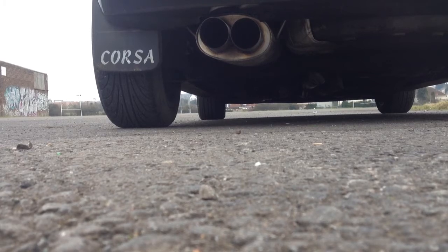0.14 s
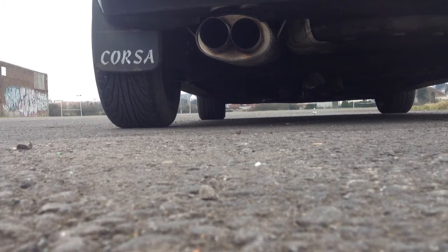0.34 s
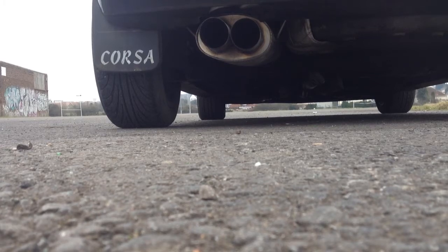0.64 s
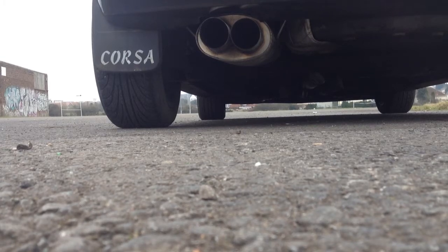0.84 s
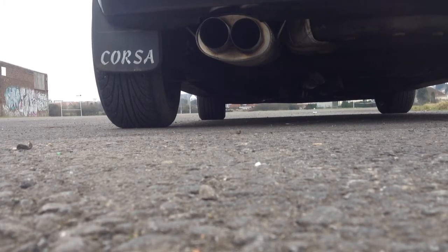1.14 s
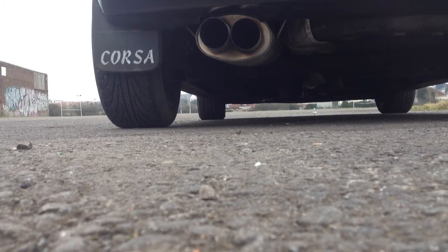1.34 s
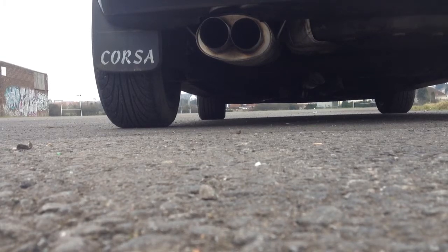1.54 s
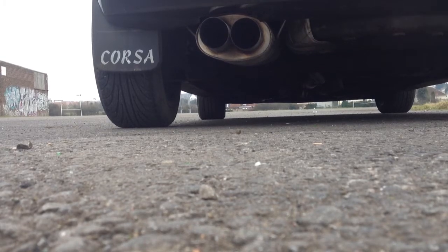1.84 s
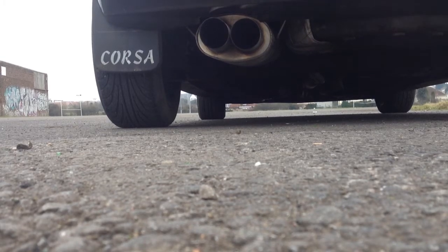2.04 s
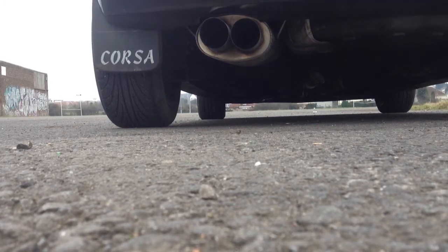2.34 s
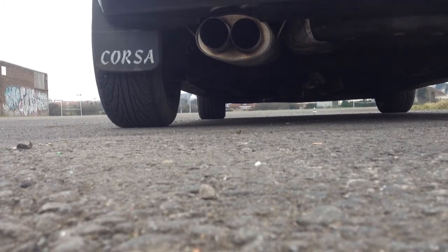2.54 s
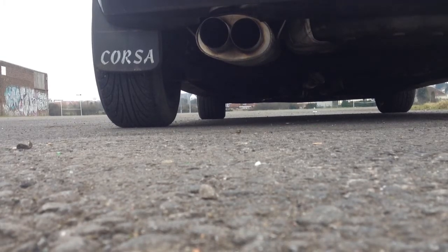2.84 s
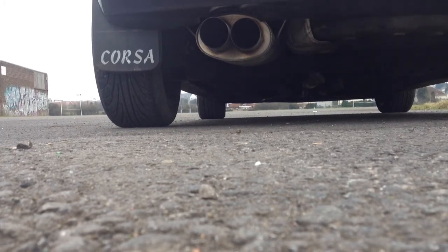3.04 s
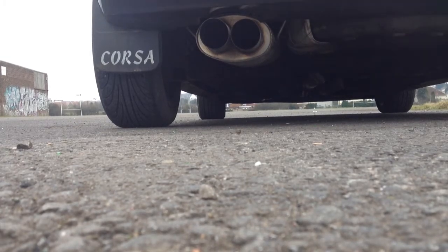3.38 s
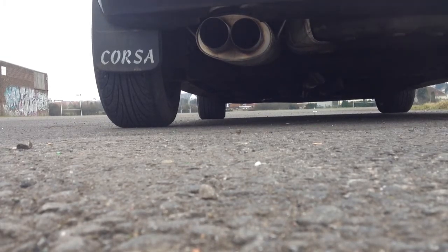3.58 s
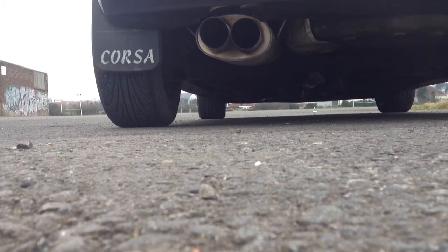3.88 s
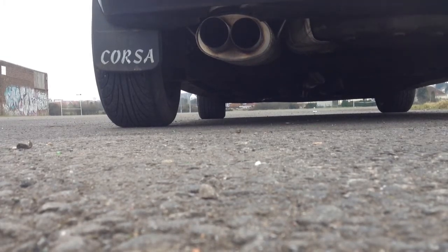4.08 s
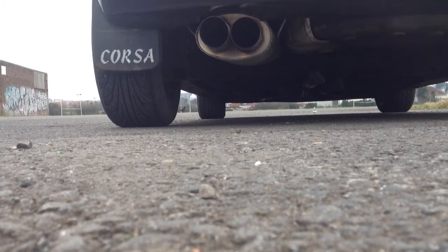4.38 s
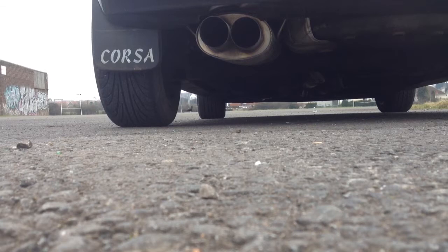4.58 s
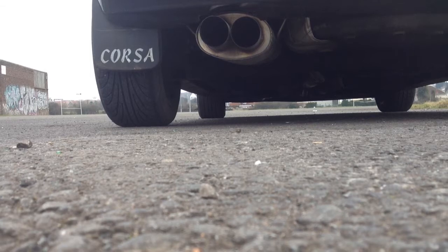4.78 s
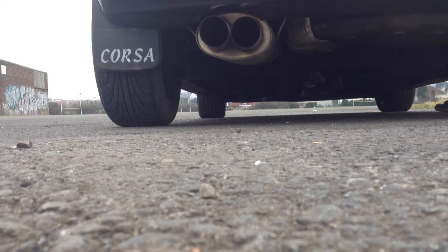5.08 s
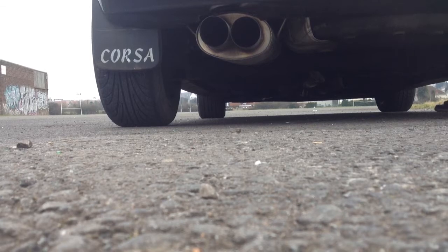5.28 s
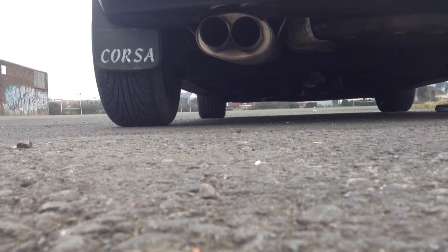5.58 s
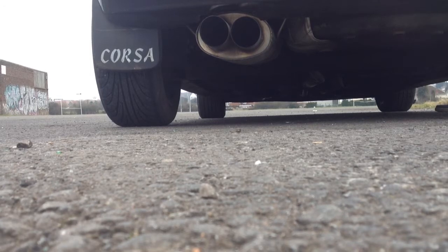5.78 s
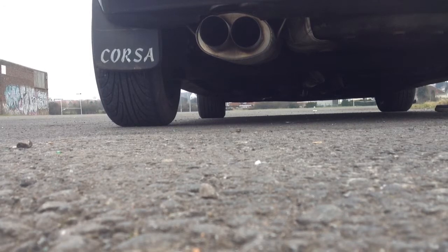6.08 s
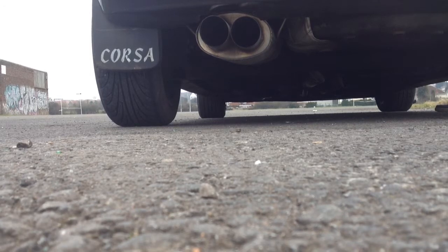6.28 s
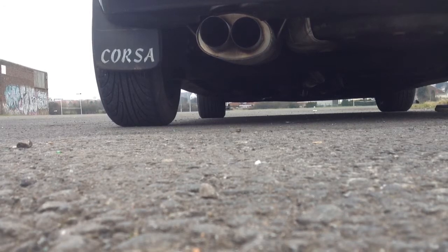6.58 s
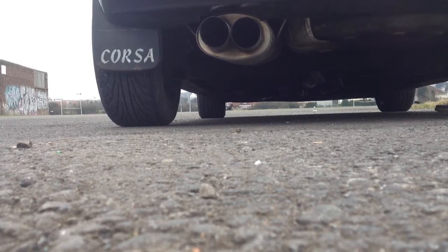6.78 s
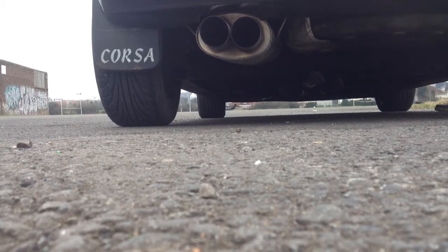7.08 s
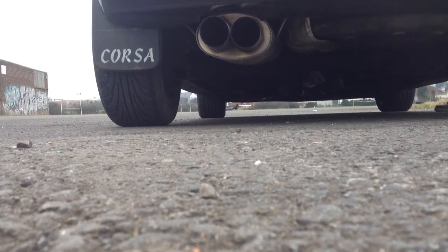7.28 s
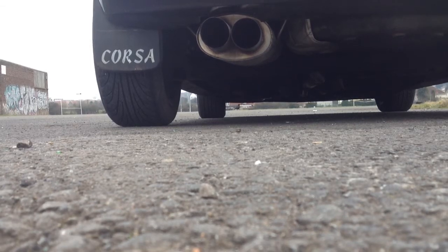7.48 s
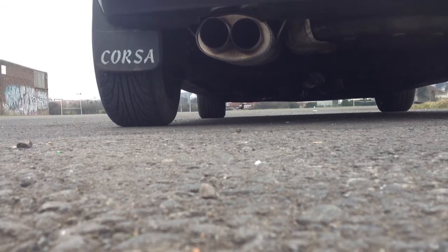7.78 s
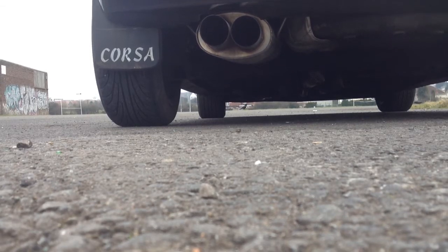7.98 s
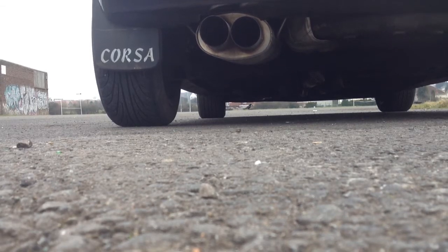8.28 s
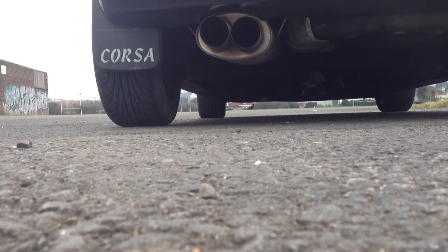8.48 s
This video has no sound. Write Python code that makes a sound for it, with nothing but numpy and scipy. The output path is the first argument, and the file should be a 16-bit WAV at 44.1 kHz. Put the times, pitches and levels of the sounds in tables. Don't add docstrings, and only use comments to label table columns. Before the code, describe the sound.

Ground-level, close and dry, behind a small four-cylinder car in an open lot. From 0 s it idles at about 26 pulses a second: soft, low, uneven puttering with random richer puffs, over ticking valve clatter and fine hiss. Cloth rubs at the start; shoe scuffs and knocks come around 0.8, 1.4, 1.8 and 2.3 s. At about 3.15 s the car door slams, by far the loudest hit, a hard crack with hollow panel ring and quick rebounds; the idle ducks slightly and recovers. A heavy seat thud lands at 4.0 s, with smaller bumps and gritty ticks until 5.75 s. At 6.4 s air whistles in and the exhaust leaps to a throaty growl, peaking near 6.85 s, then drops to a smoother pumping note, refiring quietly near 7.3 s. A higher blip peaks at 7.75 s and falls until 8.4 s. A third starts at 8.5 s, still rising at the end.

```python
import sys
import numpy as np
from scipy import signal
from scipy.fft import rfft, irfft, next_fast_len
from scipy.io import wavfile
from scipy.ndimage import uniform_filter1d

SR = 44100
rng = np.random.default_rng(int(sys.argv[2]) if len(sys.argv) > 2 else 0)


def natural_amplitude(level_db):
    exponent = np.asarray(level_db, float) / 20
    return 10 ** exponent


def materialize(psi):
    bounded = np.clip(np.atleast_2d(psi).T, -1, 1)
    quanta = np.round(bounded * 32767).astype(np.int16)
    wavfile.write(sys.argv[1], SR, quanta)


N = 380583
TIME_S = np.arange(N) / SR


def rms_one(x):
    return x / np.sqrt(np.mean(x ** 2) + 1e-20)


def in_time(rows):
    s, *columns = np.transpose(rows)
    return [np.interp(TIME_S, s, c) for c in columns]


def ramp(start_s, length_s):
    return ((TIME_S - start_s) / length_s).clip(0, 1)


def drift(rate):
    r = np.exp(-80 * np.pi * rate / SR)
    slow = signal.lfilter([1], [1, -2 * r, r * r], rng.standard_normal(N // 40 + 2002))
    slow = slow[2000:]
    return np.interp(np.arange(N) / 40, np.arange(len(slow)), rms_one(slow))


def resonate(x, hz, width_hz, order=1):
    r = np.exp(-np.pi * width_hz / SR)
    b = [(1 - r * r) / 2, 0, (r * r - 1) / 2]
    a = [1, -2 * r * np.cos(2 * np.pi * hz / SR), r * r]
    for _ in range(order):
        x = signal.lfilter(b, a, x + 1e-18)
    return x


def banded_noise(spectrum, patchy_db):
    hz, level_db = np.transpose(spectrum)
    size = next_fast_len(N)
    bins = np.fft.rfftfreq(size, 1 / SR) + 1
    shape_db = np.interp(np.log(bins), np.log(hz), level_db, -99, -99)
    coloured = rfft(rng.standard_normal(size)) * natural_amplitude(shape_db)
    out = np.zeros(N)
    for centre in np.arange(np.floor(2 * np.log2(hz[0])), 2 * np.log2(hz[-1]) + 1):
        share = np.clip(1 - abs(2 * np.log2(bins) - centre), 0, 1)
        out += irfft(coloured * share)[:N] * natural_amplitude(patchy_db * drift(6.1))
    return rms_one(out)


def add(out, s, sound):
    i = round(s * SR)
    out[i:i + len(sound)] += sound[:N - i]


def burst(peak_db, t60, hz, spread):
    t = np.arange(int(.25 * SR)) / SR
    envelope = natural_amplitude(-60 * t / t60) * np.minimum(t / 0.0015, 1)
    puff = resonate(rng.standard_normal(len(t)) * envelope, hz, spread * hz, order=2)
    return natural_amplitude(peak_db) * puff / abs(puff).max()


# (t/s, firing rate f/Hz)
CRANK_SPEED = [(0.0, 26.41), (0.8, 25.51), (1.7, 26.11), (2.6, 25.68), (3.6, 26.15), (6.1, 25.64),
               (6.498, 25.96), (6.857, 71.72), (6.896, 67.08), (7.233, 56.45), (7.453, 55.34),
               (7.565, 60.97), (7.725, 91.54), (7.757, 91.15), (8.254, 70.81), (8.519, 62.74),
               (8.578, 65.77), (8.63, 72.6)]


def crankshaft():
    speed, = in_time(CRANK_SPEED)
    return speed


# (pedal down t/s, lift and fuel cut t/s, fuel back t/s, level when fuel is back/dB)
BLIPS = [
    (6.409, 6.855, 7.272, -24.5),
    (7.437, 7.75, 8.41, -21),
    (8.502, 9.0, 9.2, -20),
]


def pedal():
    fill_s, cut_s, turn_over_s, refire_s = 0.13, 0.012, 0.046, 0.016
    cut_push = -0.45
    throttle, push = np.zeros(N), np.ones(N)
    for down, lift, back, _ in BLIPS:
        throttle += ramp(down, fill_s) - ramp(lift, cut_s)
        push += (cut_push - 1) * ramp(lift, cut_s)
        push -= (cut_push + 1) * ramp(lift + cut_s, turn_over_s)
        push += 2 * ramp(back, refire_s)
    return throttle.clip(0, 1), push


# (t/s, level/dB)
RICH_FIRINGS = [(0.007, -38), (0.085, -35), (0.467, -36.5), (0.623, -37), (0.778, -42), (0.975, -39),
                (1.091, -37.5), (1.285, -36.5), (1.554, -38), (1.9, -35.5), (2.015, -37), (2.169, -42),
                (2.209, -35.5), (2.598, -39), (2.831, -38.5), (2.947, -40), (3.523, -35.5), (4.176, -37.5),
                (4.446, -35.5), (4.482, -37.5), (4.521, -33.9), (4.639, -40.5), (4.715, -37.5),
                (4.752, -44.5), (4.87, -36.3), (5.063, -39), (5.332, -37.5), (5.448, -39), (5.562, -38.5),
                (6.03, -40.5)]


def note_level(octaves, throttle, push):
    lean_db, firing_s, refire_sag_db_per_s = -42.5, 0.0237, 57
    ends = [s - firing_s for s, _ in RICH_FIRINGS[1:]] + [BLIPS[0][0]]
    hunting = []
    for (s, db), end in zip(RICH_FIRINGS, ends):
        hunting += [(s, db), (max(end, s + .001), lean_db)]
    light_db, = in_time(hunting)
    for _, lift, back, db in BLIPS:
        refired_db = db - refire_sag_db_per_s * (TIME_S - back).clip(0)
        light_db = np.where(TIME_S > lift, refired_db, light_db)
    loaded_db = -11 + 8 * octaves.clip(None, 0)
    burning_db = light_db + throttle * (loaded_db - light_db)
    pumping_db = -18 + 9 * octaves
    return np.where(push < 0, pumping_db, burning_db)


def pipe(clicks, modes, chance):
    out = np.zeros(N)
    for hz, width_hz, db, late_ms in modes:
        scatter_db = 0.16 * min(late_ms, 19) * chance
        struck = clicks * natural_amplitude(db + scatter_db)
        add(out, max(late_ms, 0) / 1000, resonate(struck, hz, width_hz, order=4))
    return out


CYLINDER_DB = [0.34, 0.74, 0.087, -0.7]
# (f/Hz, width f/Hz, level/dB, arrival t/ms)
IDLING_PIPE = [(184.7, 110.5, 6.1, 0.4), (231.8, 75.3, 2.3, 3.0), (276.6, 111, -12.2, 9.9),
               (343, 55, -7.5, 19)]
LOADED_PIPE = [(69.5, 150, -12.5, 4), (177, 138, 6.5, 4.15), (245, 162, -4.5, 6.87), (331, 143, -8.5, 19),
               (450, 163, -16.5, 11.78), (696, 140, -28.5, 10.04)]
PUMPING_PIPE = [(70, 164, -14, 1.73), (174.5, 115, 5, 1.58), (241, 102, -16.5, 4.15), (349, 118, -13.5, 34),
                (435.5, 75, -20, 18), (520, 110, -22.5, 10)]


def exhaust(turns, note_db, push, throttle, fast):
    idle_uneven_db, loaded_uneven_db, pumping_uneven_db = 2.0, 1.0, .75
    burning_uneven_db = idle_uneven_db + throttle * (loaded_uneven_db - idle_uneven_db)
    uneven_db = np.where(push < 0, pumping_uneven_db, burning_uneven_db)
    clicks = np.diff(np.floor(turns), prepend=0).clip(0, 1)
    at = np.flatnonzero(clicks)
    luck_db, scatter = np.zeros((2, N))
    luck_db[at] = uneven_db[at] * rng.uniform(-1.7, 1.7, len(at)) + np.resize(CYLINDER_DB, len(at))
    scatter[at] = 0.56 * rng.standard_normal(len(at)) + np.resize([1, -1], len(at))
    burning = push.clip(0, 1)
    light = burning * (1 - throttle)
    voices = [(light * (1 - fast), IDLING_PIPE),
              (burning * throttle + light * fast, LOADED_PIPE),
              (push.clip(-1, 0), PUMPING_PIPE)]
    out = np.zeros(N)
    for share, modes in voices:
        usual = np.sqrt(uniform_filter1d(pipe(clicks, modes, 0) ** 2, size=5100).clip(1e-14))
        pulses = clicks * share * natural_amplitude(note_db + luck_db) / usual
        out += pipe(pulses, modes, scatter)
    return out


# (multiple of the firing rate, level/dB)
HUM = [(1, -63.5), (2, -66), (3, -69), (4, -67.5)]


def hum(turns, speed):
    lag_turns = 0.61
    lines = np.zeros(N)
    for multiple, db in HUM:
        lines += natural_amplitude(db + 6) * np.sin(2 * np.pi * multiple * (turns - lag_turns))
    lines *= natural_amplitude(11.6 * np.log2(speed / 33.0))
    return signal.sosfilt(signal.butter(2, 130, fs=SR, output="sos"), lines)


# (f/Hz, level/dB per Hz)
CLATTER = [(30, -36), (60, -31), (130, -0.5), (300, 3.5), (450, -3), (800, -4.5), (1400, -1.5),
           (2000, -0.8), (2400, -4.5), (3700, -10), (4500, -14), (6000, -39)]
# (f/Hz, width f/Hz, level/dB, rise level/dB per octave of speed)
PANELS = [(519.3, 23, -16, -0.5), (718.4, 52, -13.5, -1), (947, 58, -14.5, -2), (1192.6, 49, -9, -0.5),
          (1731, 140, -11, 1.5), (1928, 150, -10, 3), (2014, 19, -19, 4.5), (3280, 92, -32, 8.5),
          (3720, 96, -23, 2.5), (10630, 600, -42, 2)]
# (f/Hz, level/dB per Hz)
HISS = [(2710, -28), (4600, -8.5), (4820, 4), (5220, -2.5), (5720, -0.5), (6430, 1.5), (6980, -2),
        (8420, -7), (9370, -13.5), (10600, -12.5), (11500, -15), (13200, -13.5), (15500, -18)]


def clatter(turns, speed, octaves, throttle):
    clatter_db = -33.5 + (12 + 1.7 * octaves) * octaves + 0.5 * throttle
    hiss_db = -48 + (12.5 + 1.5 * octaves) * octaves + 1.4 * throttle
    since = (turns - .36) % 1
    swell = np.exp(-since / 0.15) * np.minimum(since / 0.015, 1)
    puff = natural_amplitude((6.0 + 1.97 * drift(24)) * swell)
    above_idle = np.log2(speed / 28.0)
    rings = np.zeros(N)
    for hz, width_hz, db, rise_db in PANELS:
        ring = rms_one(resonate(rng.standard_normal(N) * puff, hz, width_hz, order=2))
        wander_db = 3.2 * drift(18) / (1 + 0.4 * above_idle)
        rings += natural_amplitude(db + rise_db * above_idle + wander_db) * ring
    body = banded_noise(CLATTER, patchy_db=1.8) * puff
    hiss = banded_noise(HISS, patchy_db=1.4) * puff ** 0.74
    return natural_amplitude(clatter_db - 0.5) * (rms_one(body) + rings) + natural_amplitude(hiss_db - 2.0) * rms_one(hiss)


def air():
    high = signal.butter(2, 9000, "high", fs=SR, output="sos")
    return natural_amplitude(-81) * signal.sosfilt(high, rng.standard_normal(N))


# (start t/s, length t/s, level/dB, centre f/Hz)
SCUFFS = [
    (0.01, 0.48, -58, 7750),
    (0.097, .34, -72, 13100),
    (0.716, 0.19, -66, 6500),
    (1.9, 0.47, -76, 12500),
    (5.37, .12, -58.5, 6100),
]


def scuffs():
    out = np.zeros(N)
    for s, length, db, hz in SCUFFS:
        rub = resonate(rng.standard_normal(SR // 2), hz, 0.5 * hz, order=2)[:int(length * SR)]
        add(out, s, natural_amplitude(db) * rms_one(rub) * np.hanning(len(rub)))
    return out


# (t/s, peak level/dB, t60 t/s, centre f/Hz)
KNOCKS = [(0.783, -44, .05, 3500), (0.792, -50, 0.02, 6000), (0.75, -52, .06, 1500), (0.80, -40, 0.18, 520),
          (0.844, -37, .03, 800), (0.837, -39, .025, 4500), (0.856, -37, 0.018, 2760),
          (1.374, -36.5, 0.15, 860), (1.378, -46, 0.072, 4000), (1.782, -34, 0.31, 450),
          (2.308, -31.5, .1, 1000), (2.31, -48, 0.12, 6000), (3.822, -49, 0.055, 5000),
          (4.007, -22, 0.056, 403), (4.013, -29, 0.066, 940), (4.01, -34.5, 0.13, 131),
          (4.026, -31.5, 0.14, 303), (4.544, -37.5, 0.065, 473), (4.615, -36, 0.1, 220),
          (4.662, -39, 0.13, 130), (4.947, -60, 0.044, 5000), (4.982, -33.5, 0.17, 735),
          (5.365, -53, .03, 7500), (5.371, -31.5, 0.023, 880), (5.433, -57, .03, 10000),
          (5.456, -46, 0.023, 5970), (5.49, -50, .03, 5000), (5.563, -57, 0.034, 6000),
          (5.745, -34, 0.12, 676)]


def knocks():
    out = np.zeros(N)
    for s, peak_db, t60, hz in KNOCKS:
        add(out, s, burst(peak_db, t60, hz, spread=0.91))
    return out


# (t/s, peak level/dB, t60 t/s, centre f/Hz)
SLAM = [(3.126, -16.5, 0.15, 275), (3.127, -19, 0.091, 1740), (3.142, -12.5, 0.26, 503),
        (3.149, -3.5, 0.17, 1920), (3.156, -28, 0.12, 3550), (3.158, 1.5, 0.13, 682),
        (3.159, -5, 0.26, 196), (3.161, -26, 0.035, 12400), (3.171, -5, 0.062, 1640),
        (3.175, -19, 0.16, 112), (3.186, -9, 0.084, 450), (3.197, -11, 0.1, 820), (3.212, -23, 0.21, 600),
        (3.229, -22, 0.14, 915), (3.257, -27, 0.091, 303)]
# (f/Hz, level/dB, t60 t/s)
DOOR_MODES = [(270, -8, 0.16), (426, -7, 0.1), (562, -2, 0.33), (1200, -34, 0.21), (1510, -12, 0.16),
              (1526, -2, 0.16), (1843, -5, 0.15), (2610, -17, 0.13), (3310, -21, 0.15), (3840, -7, 0.081)]


def door():
    cracks = np.zeros(N)
    for s, peak_db, t60, hz in SLAM:
        add(cracks, s, burst(peak_db, t60, hz, spread=0.76))
    panels = np.zeros(N)
    for hz, db, t60 in DOOR_MODES:
        panels += natural_amplitude(db - 3.5) * resonate(cracks, hz, 6.8 / t60 + 25)
    return 0.49 * cracks + panels


def gain_dip():
    duck_at_s, duck_db, duck_back_s = 3.2, -5.5, 1.67
    since = TIME_S - duck_at_s
    return natural_amplitude(duck_db * np.exp(-since.clip(0) / duck_back_s) * (since > 0))


# (start t/s, length t/s, level/dB)
GULPS = [
    (6.418, 0.045, -55.5),
    (7.499, 0.13, -56.5),
    (8.526, 0.052, -49.5),
]
# (f/Hz, width f/Hz, level/dB)
WHISTLE = [(2000, 500, 5), (2530, 110, 3), (3920, 59, 2), (4820, 140, 4.5), (3020, 3500, 3.5),
           (7000, 2400, -6)]


def gulps():
    out = np.zeros(N)
    for s, length, db in GULPS:
        rush = np.zeros(SR // 10)
        for hz, width_hz, tone_db in WHISTLE:
            tone = resonate(rng.standard_normal(SR // 10), hz, width_hz, order=2)
            rush += natural_amplitude(tone_db) * rms_one(tone)
        rush = rush[:int(length * SR)]
        add(out, s, natural_amplitude(db) * rush * signal.windows.tukey(len(rush), .5))
    return out


def scene():
    full_speed_hz, pulse_lead_s, first_turn = 70, .0125, .75
    samples = np.arange(N)
    ahead = samples + pulse_lead_s * SR
    speed = crankshaft()
    turns = np.interp(ahead, samples, first_turn + np.cumsum(speed) / SR)
    octaves = np.log2(speed / full_speed_hz)
    throttle, push = pedal()
    fast = (2 * octaves + 2).clip(0, 1)
    controls = [note_level(octaves, throttle, push), push, throttle, fast]
    controls = [np.interp(ahead, samples, c) for c in controls]
    engine = exhaust(turns, *controls) + hum(turns, speed) + clatter(turns, speed, octaves, throttle)
    return (engine * gain_dip() + air() + scuffs() + knocks() + door() + gulps())[None]


def low_pass(x):
    return signal.sosfilt(signal.butter(12, 15350, fs=SR, output="sos"), x)


def record(dry):
    x = signal.sosfilt(signal.butter(3, 48, "high", fs=SR, output="sos"), dry)
    mix = 0.85 * np.tanh(x / 0.81)
    return low_pass(mix)


dry = scene()
out = record(dry)
materialize(out)
```